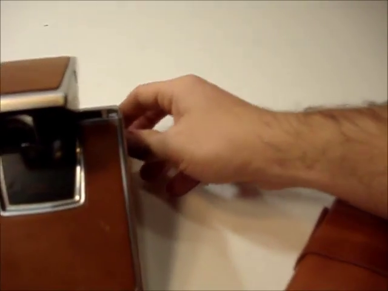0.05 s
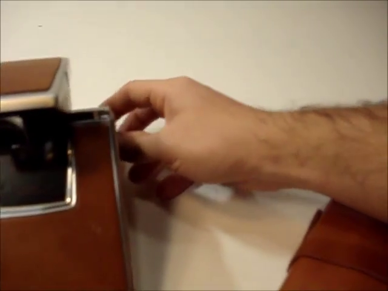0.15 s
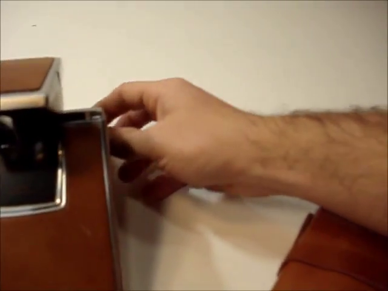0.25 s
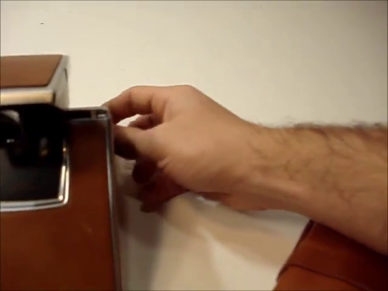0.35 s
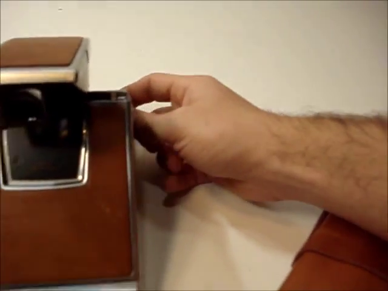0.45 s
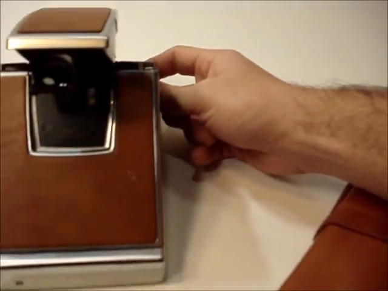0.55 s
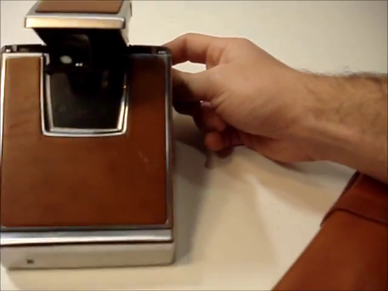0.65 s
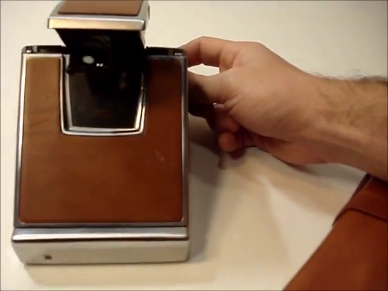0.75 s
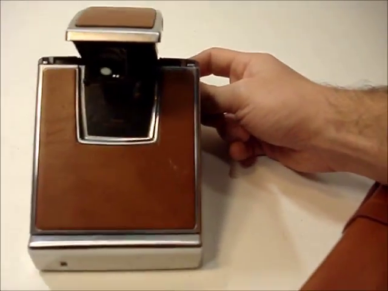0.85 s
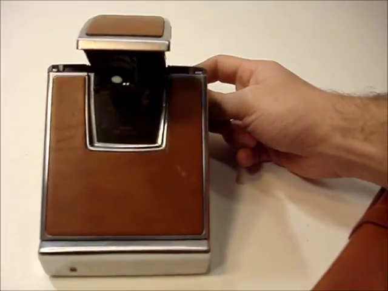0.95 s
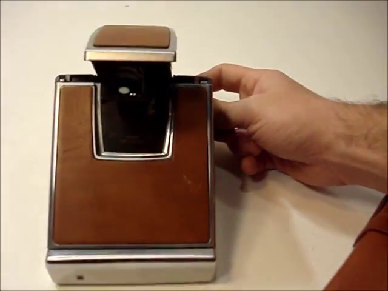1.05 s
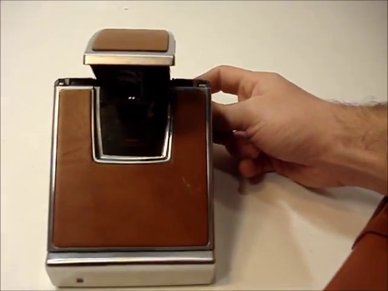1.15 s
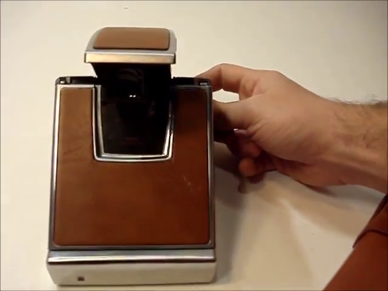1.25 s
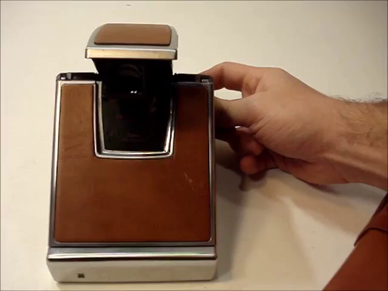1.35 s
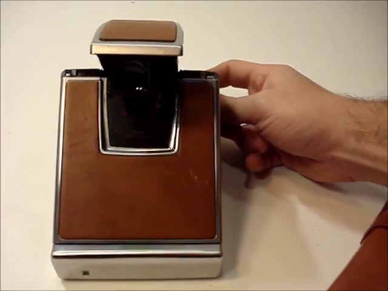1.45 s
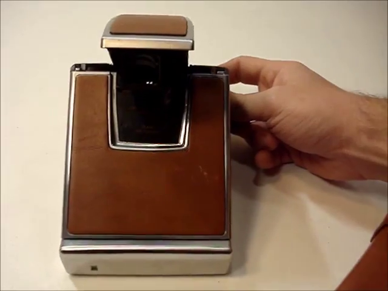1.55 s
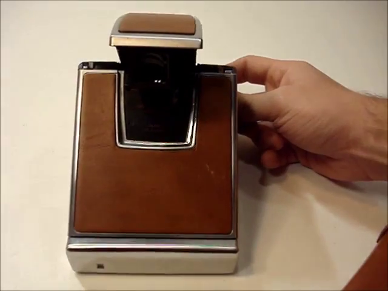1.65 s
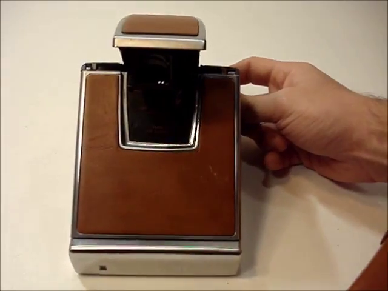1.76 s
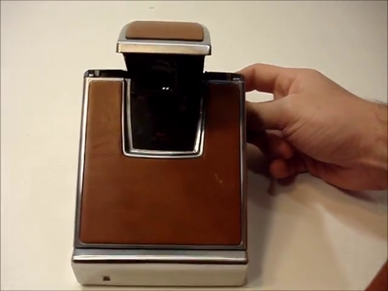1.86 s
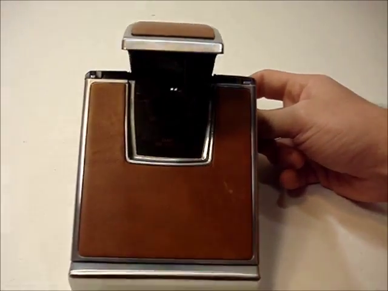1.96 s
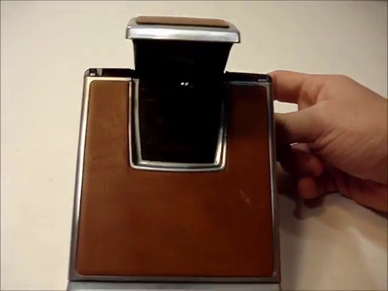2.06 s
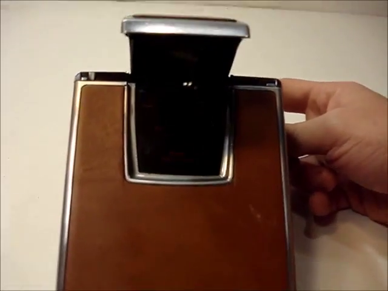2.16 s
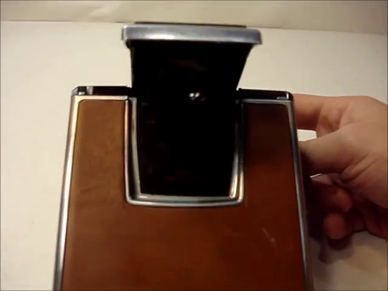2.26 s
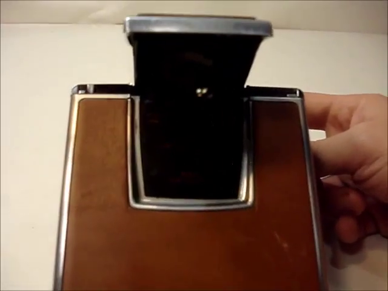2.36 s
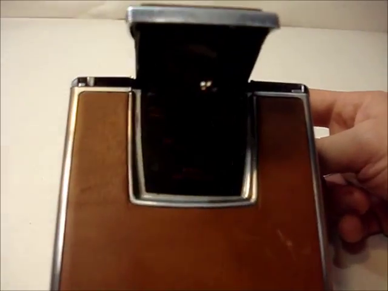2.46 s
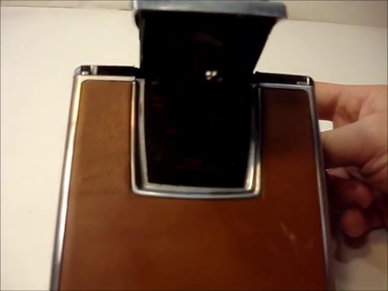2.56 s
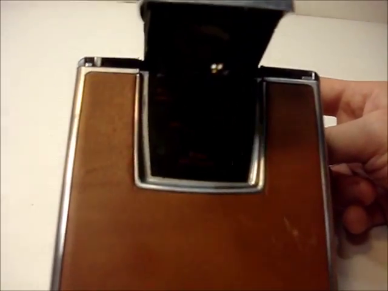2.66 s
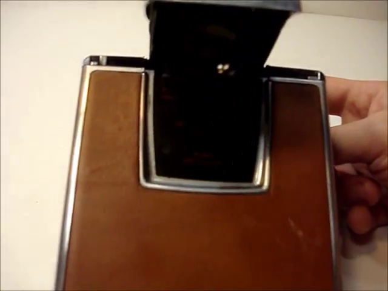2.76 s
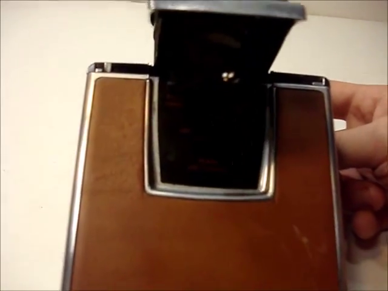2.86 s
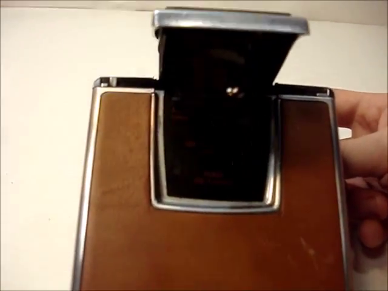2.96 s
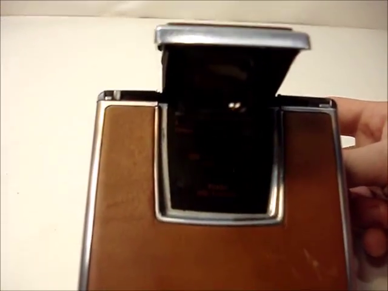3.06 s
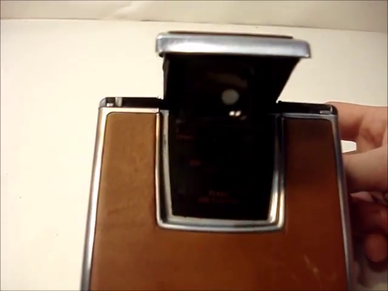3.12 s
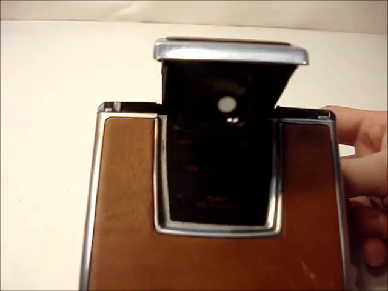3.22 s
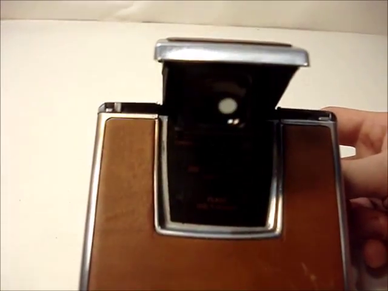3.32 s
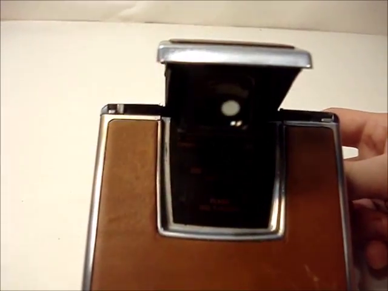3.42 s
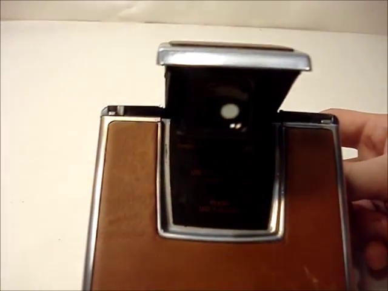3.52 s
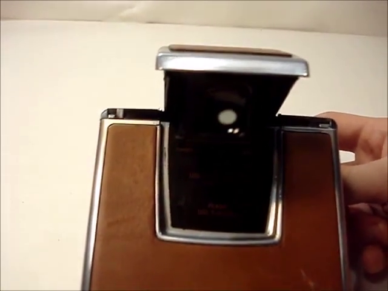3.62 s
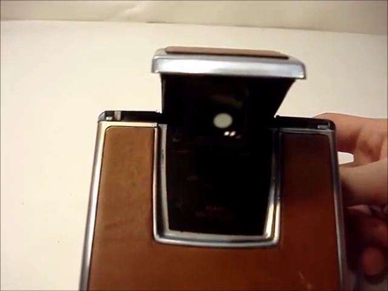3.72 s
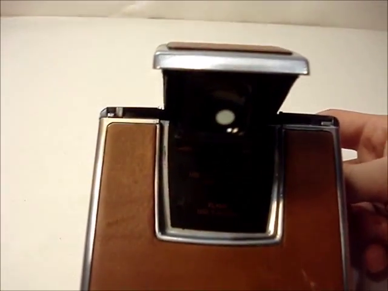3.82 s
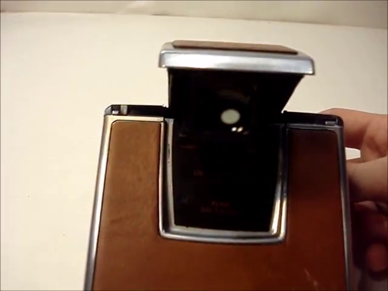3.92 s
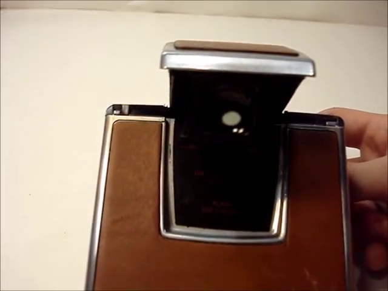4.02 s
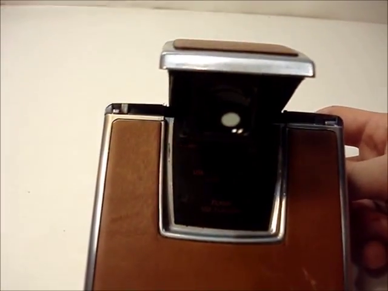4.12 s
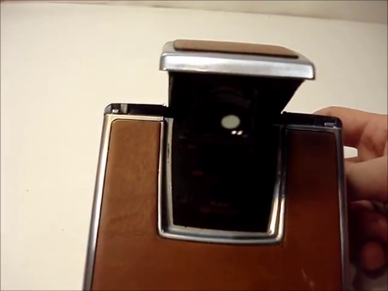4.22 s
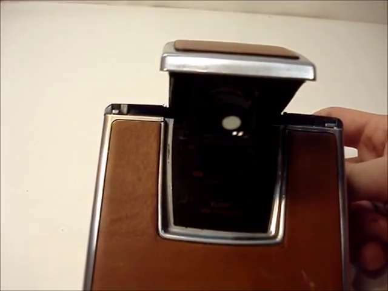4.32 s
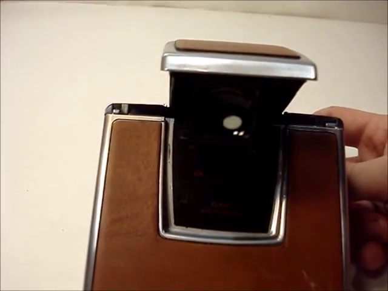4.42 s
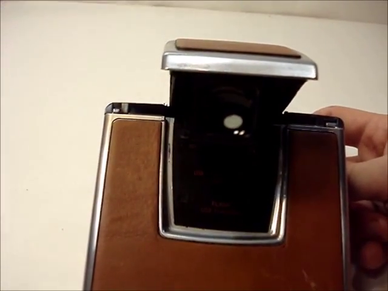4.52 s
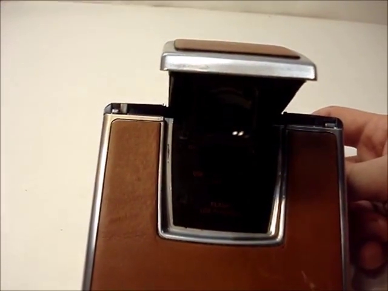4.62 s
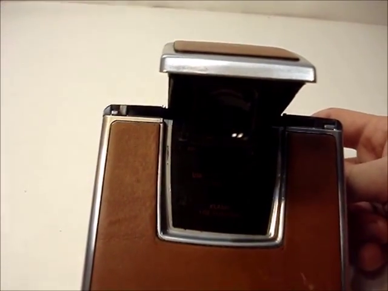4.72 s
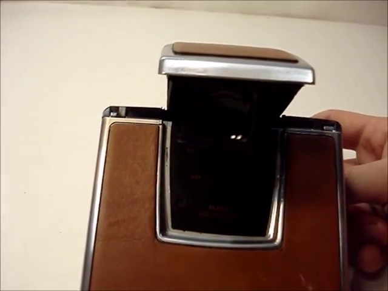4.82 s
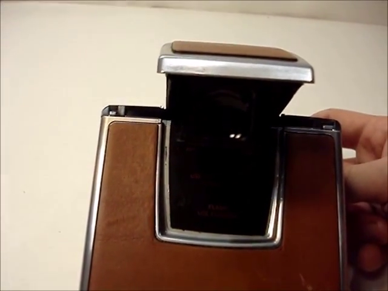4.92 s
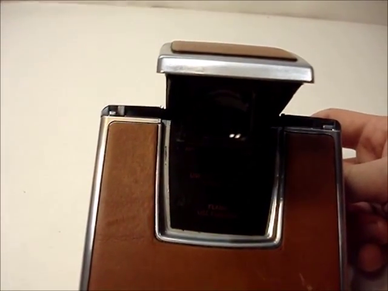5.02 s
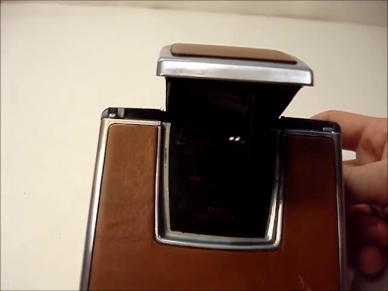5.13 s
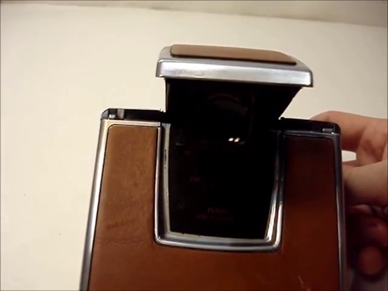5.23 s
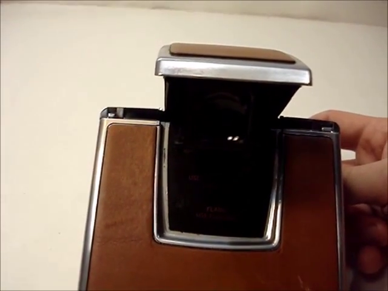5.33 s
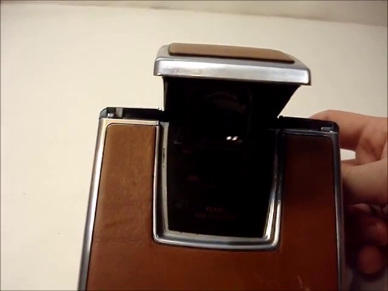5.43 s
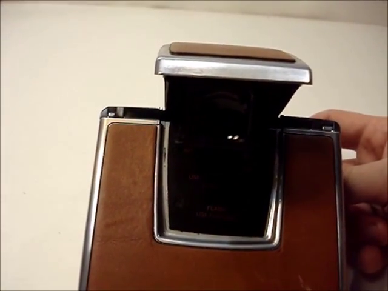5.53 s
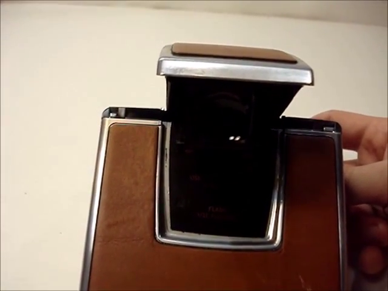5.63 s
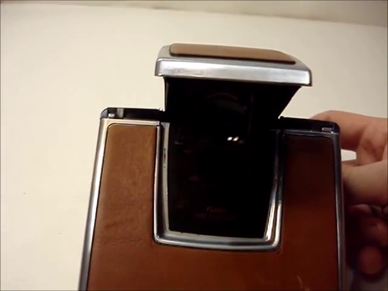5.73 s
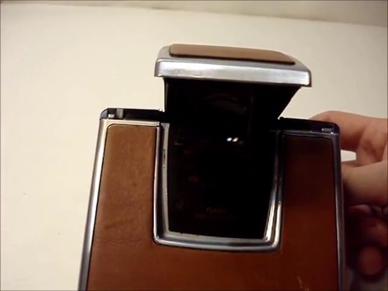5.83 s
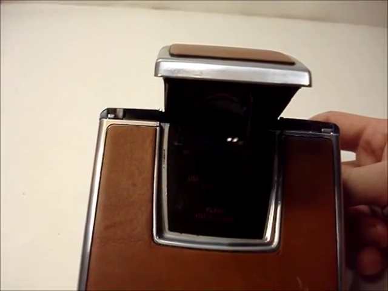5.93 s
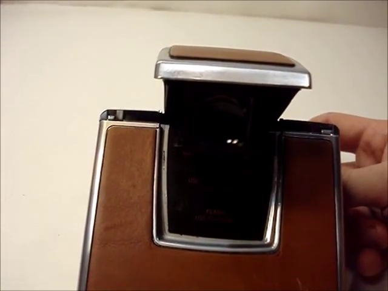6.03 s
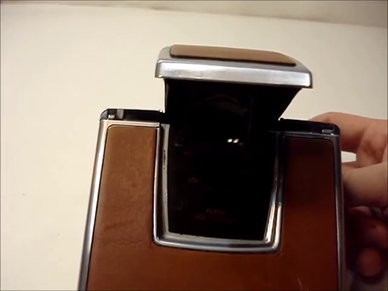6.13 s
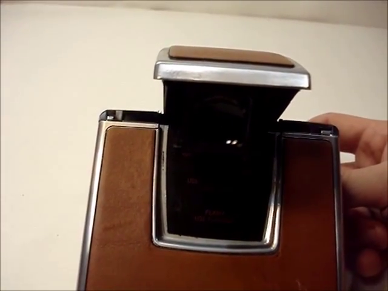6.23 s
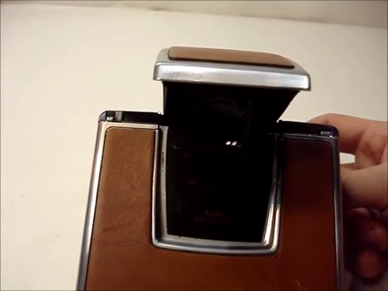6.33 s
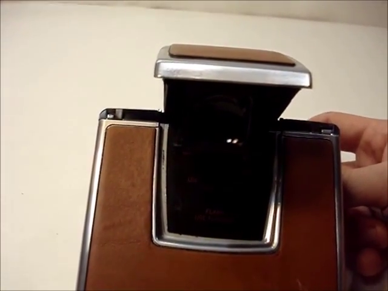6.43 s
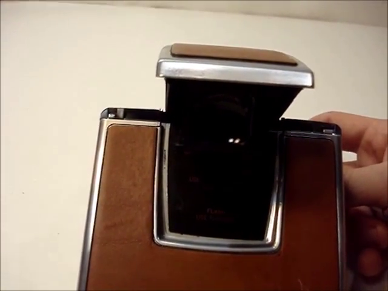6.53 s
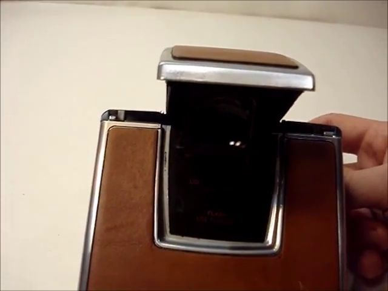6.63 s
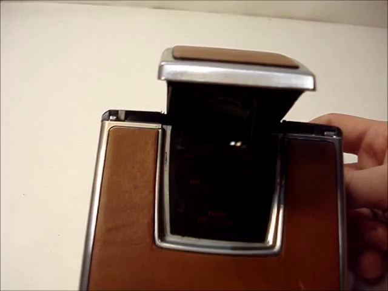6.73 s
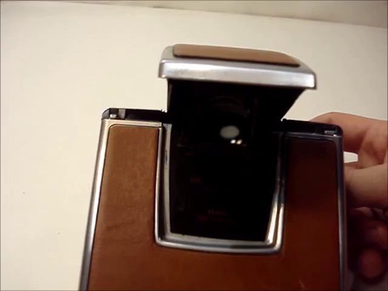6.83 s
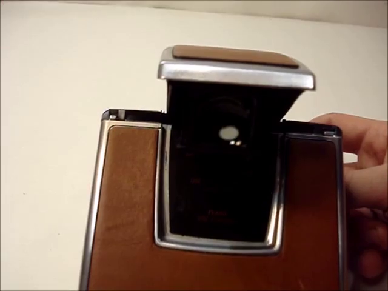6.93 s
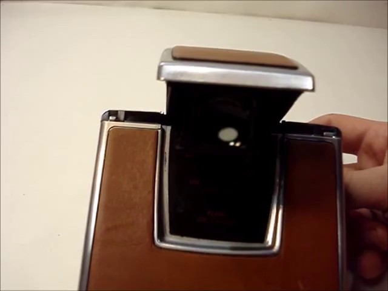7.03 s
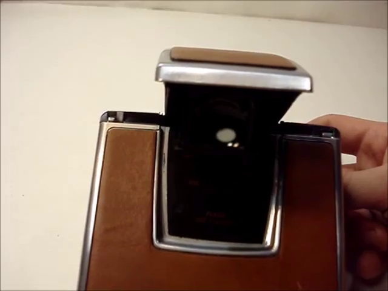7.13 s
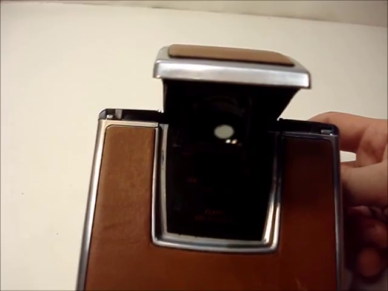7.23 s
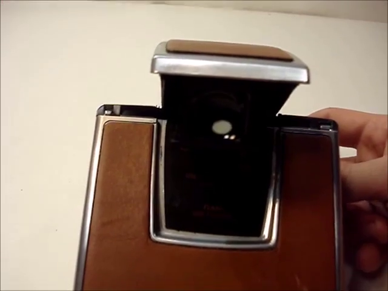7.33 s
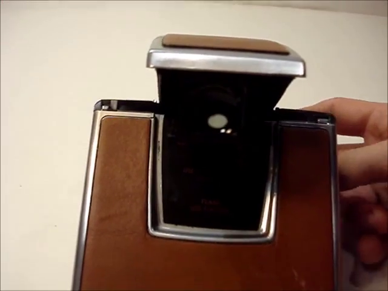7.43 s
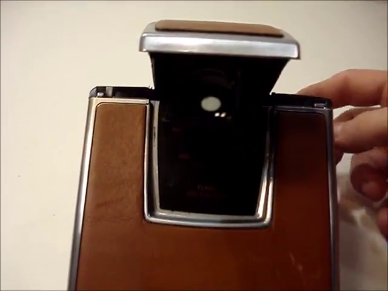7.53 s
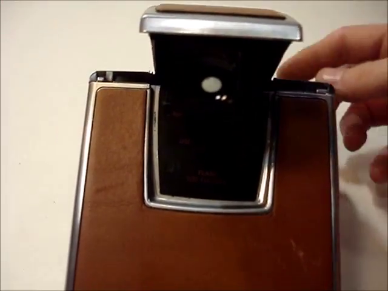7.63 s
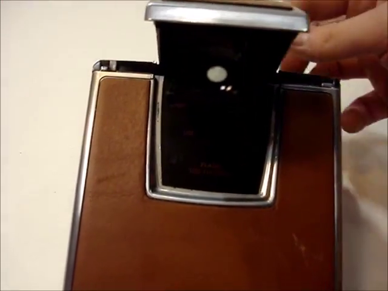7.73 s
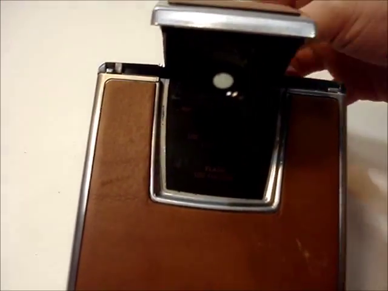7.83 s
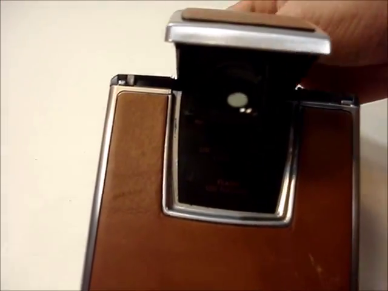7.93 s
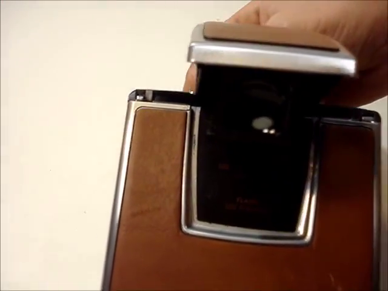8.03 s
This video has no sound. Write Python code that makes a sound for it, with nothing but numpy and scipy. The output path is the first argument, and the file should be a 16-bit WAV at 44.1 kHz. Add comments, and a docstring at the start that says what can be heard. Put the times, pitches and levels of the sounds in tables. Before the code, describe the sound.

Twice, an instant camera's shutter snaps and its small geared motor whirs steadily, then clicks to a stop, close by on a table.

```python
"""Faint room air and hiss come first; then a shutter clicks and a small motor whirs up in a folding instant camera.
The camera runs through its cycle twice on a table: the motor releases the mirror, which slaps upward and bounces,
then drives gears and rollers until a cam stops it, and the electronics buzz faintly for a moment.
The motor and gears follow one shaft angle: sine tones plus filtered tooth knocks and rubbing noise.
Strikes are shaped noise bursts, slaps are decaying modes, jolts are slow pulses and the buzz is steady sines."""
import sys
import numpy as np
from scipy import signal
from scipy.fft import rfft, irfft, next_fast_len
from scipy.io import wavfile

SR = 44100
rng = np.random.default_rng(int(sys.argv[2]) if len(sys.argv) > 2 else 0)


def put_to_file(sound):
    """Save the sound as 16-bit audio at rate SR, in the file named by the first command-line argument."""
    columns = np.atleast_2d(sound).T  # one column per channel
    safe = np.clip(columns, -1, 1)
    whole_steps = np.round(safe * 32767)
    wavfile.write(sys.argv[1], SR, whole_steps.astype(np.int16))


N = 356019

# two motor runs a cycle, to release the mirror and to drive the rollers:
# (on [s], off [s], gears [dB], tones [dB])
MOTOR_RUNS = [(1.27, 1.409, 2.5, 0.5), (1.593, 3.271, 0, -0.5), (4.719, 4.865, 1, 0.5),
              (5.068, 6.964, 0, 0)]
# speed that the load allows in each cycle, three poles passing per shaft turn: (time [s], pole rate [Hz])
FIRST_LOAD_SPEED = [(1.4, 460), (1.75, 474), (1.86, 451), (1.94, 466), (2.16, 468), (2.31, 444),
                    (3.02, 418), (3.15, 415), (3.26, 380)]
SECOND_LOAD_SPEED = [(4.85, 408), (5.24, 412), (5.36, 382), (5.49, 406), (5.72, 408), (5.92, 384),
                     (5.99, 393), (6.09, 393), (6.3, 383), (6.85, 373), (6.96, 330)]
# depth of the slow waver of each of the four pole tones: (rms swell [dB])
POLE_WAVER = [1.1, 2.2, 1.3, 2.4]
# the octave of the pole tone swells for a moment: (time [s], half length [s], level [dB])
OCTAVE_SWELLS = [(2.97, .04, 4), (3.22, .04, 4), (6.03, .1, 5.5)]
# modes of the motor's frame, which the pole tones glide through: (frequency [Hz], width [Hz], level [dB])
FRAME_MODES = [(385, 44, -36.5), (437, 40, -26.6), (748, 24, -43), (786, 24, -33), (838, 14, -34),
               (876, 22, -35.5), (1190, 110, -43), (1402, 40, -33), (1625, 24, -41)]
# weaker tones of the shaft: (multiple of the shaft rate, relative level [dB])
SHAFT_TONES = [(4, -6.5), (5, -7.5), (7, -8), (8, -5.5), (10, -5), (11, -7.5), (13, -5.5), (14, -3),
               (15, -7.5), (16, -9), (17, -27.5)]
# colour of the gear rattle: (frequency [Hz], relative level [dB])
GEAR_COLOUR = [(60, -14), (140, -9.5), (220, -10), (320, -6.5), (500, -4.5), (750, 2.5), (1020, -4.5),
               (1400, 0.5), (2200, 1.5), (3000, 2), (4000, 1), (4900, 4.5), (8000, -0.5), (10000, -3.5)]
# moments when the loose gears settle into a regular buzz: (time [s], half length [s], how fully [0-1])
SETTLED_MOMENTS = [(1.865, .022, .7), (3.21, .035, .7), (6.052, .021, 1), (6.628, .021, 1),
                   (6.79, .015, .6)]
# housing resonances as heard from three positions:
# (frequency [Hz], width [Hz], far [dB], near [dB], near and higher [dB]), levels relative
HOUSING_MODES = [(2060, 130, -11, -0.5, 3), (2550, 104, 1, 2.5, -2), (2880, 200, -11, -30, -7.5),
                 (3510, 120, 0, 0.5, -9), (4460, 260, -11, -30, -3), (4770, 150, -6.5, -4.5, -4.5),
                 (5280, 180, -9, -4.5, -12), (7010, 140, 1, 3, -12), (7310, 380, 3, -30, -15),
                 (7530, 170, -21, -18, 0), (8680, 640, -10, 2, -14)]
# where the microphone is: (time [s], position [0 far, 1 near, 2 near and higher])
MIC_PATH = [(2.1, 0.031), (2.4, 1.12), (3.4, 1.4), (4.6, 2)]
# loudness of the works at positions 0, 1 and 2: (gear rattle [dB], gear treble [dB], shaft tones [dB])
MIC_LEVELS = [(-31, -31, -36), (-29.5, -28, -34), (-31, -31, -36)]
# the mirror slaps up and bounces: (time [s], level [dB])
MIRROR_SLAPS = [(1.5213, -2), (1.5431, -19), (4.9951, -3.5), (5.0192, -14.5)]
# what the mirror and its frame ring with: (frequency [Hz], level [dB], t60 [s])
MIRROR_MODES = [(154, -37.5, 0.12), (229, -21, 0.08), (260, -9.5, 0.039), (442, -12, 0.068),
                (576, 2.5, 0.017), (654, 1, 0.025), (728, 0.5, 0.025), (915, -30, .045),
                (1345, -15.5, 0.046), (1470, -10, 0.036), (1880, -23, 0.051), (2884, -12.5, 0.031)]
# the small parts strike in turn through both cycles: (time [s], part, level [dB])
PART_STRIKES = [(1.258, "solenoid", -2), (1.273, "shutter", 0), (1.4082, "latch", -1.5),
                (1.4802, "spring", -2), (1.516, "linkage", -14), (1.5219, "mirror stop", -1),
                (1.528, "mirror hinge", 0), (1.598, "blades", 1), (3.212, "cam", -2.5),
                (3.222, "catch", -1), (3.236, "shutter", 3), (4.697, "solenoid", 2),
                (4.714, "shutter", 0.5), (4.859, "latch", -1.5), (4.949, "spring", 0.5),
                (4.988, "linkage", -5.5), (4.997, "mirror stop", -3.5), (5.003, "mirror hinge", 2),
                (5.061, "solenoid", -12), (5.074, "blades", 1.5), (6.903, "cam", -4), (6.913, "catch", -2),
                (6.97, "brake", 0)]
# how each part sounds, levels relative:
# (part, knock [dB], ring [dB], ring frequency [Hz], snap [dB], t60 [s])
PART_SOUNDS = [("solenoid", -45, -30.5, 2750, -38.5, 0.052), ("shutter", -31, -36, 2400, -23.5, 0.021),
               ("latch", -20, -18.5, 1545, -21, .04), ("spring", -47, -33, 1380, -46, .065),
               ("linkage", -26, -25.5, 5400, -41, 0.11), ("mirror stop", -19.5, -21, 2100, -19.5, 0.038),
               ("mirror hinge", -28.5, -25, 2700, -32.5, 0.033), ("blades", -40, -29, 2700, -28, .035),
               ("cam", -39, -41, 2650, -24.5, 0.12), ("catch", -32.5, -41, 2900, -22, 0.075),
               ("brake", -27, -43, 1400, -51, 0.027)]
# soft pushes of air and case as the works jolt: (time [s], level [dB], length [s], rebound [0-1])
JOLTS = [(1.407, -21.5, 0.0013, 0.74), (1.528, -44, .004, 0.7), (3.228, -20.5, 0.0068, 0.44),
         (4.86, -19.5, 0.0025, 0.34), (4.995, -18, 0.0032, 0.4), (6.921, -18, 0.0065, 0.46)]
# the faint buzz after each cycle: (start [s], end [s], level [dB])
BUZZ_SPANS = [(3.27, 3.79, .5), (6.96, 7.47, -1)]
# partials of the buzz: (frequency [Hz], level [dB])
BUZZ_PARTIALS = [(350, -60), (1050, -64), (1400, -63), (1755, -63), (2105, -60), (2805, -69), (3505, -75),
                 (5260, -76)]
# how fast the reflections die: (frequency [Hz], t60 [s])
ROOM_DECAY = [(200, 0.34), (530, 0.2), (1400, 0.2), (3700, 0.17), (9000, 0.11)]
# colour of room air and microphone hiss: (frequency [Hz], relative level [dB per Hz])
AIR_COLOUR = [(12, -60), (20, -25), (95, -5.5), (169, -3), (237, 0.5), (378, -1.5), (558, -2.5), (803, -4),
              (963, -6), (1390, -7.5), (1660, -9.5), (2870, -12.5), (7710, -18.5), (10000, -23.5),
              (13000, -60), (22000, -120)]

SPIN_UP_S = .043  # time constant of the run-up
COAST_S, BRAKE_S, COAST_DB_PER_S = 0.055, .13, -300  # run-on length, slowing time constant, fade
GEAR_POWER, SHAFT_POWER, POLE_POWER = 1.78, 0.58, 1  # loudness grows as these powers of the speed share
SHAFT_SHARE, POLE_SHARE = .2, .14  # shares of the loose rattle's power that repeat with shaft and poles
PLAY_TURNS = .004  # rms play of fully loose gears
SETTLE_SHARE, SETTLE_HZ = .4, 9  # depth and pace of partial settling
AIR_DB = -51.5
EDGE_HZ = 10030


def motor(on, off, gears_db, tones_db, low_db=-10, shaft_db=-7.5, flutter=.004, waver_db=3.0):
    """One shaft angle drives pole tones, shaft tones and gears. Returns (rattle and whine, pole tones)."""
    t = np.arange(on, off + COAST_S, 1 / SR)
    pole_hz, share = speed(t, on, off)
    position = np.interp(t, *np.transpose(MIC_PATH))
    rattle, treble, shaft = (np.interp(position, range(len(MIC_LEVELS)), c) for c in np.transpose(MIC_LEVELS))
    turns = np.cumsum(pole_hz / 3 * (1 + flutter * drift(len(t), 40))) / SR

    def tone(order):
        return np.sqrt(2) * np.sin(2 * np.pi * (order * turns + rng.random()))

    octave_db = sum(db * np.exp(-((t - s) / half) ** 2) for s, half, db in OCTAVE_SWELLS)
    poles = np.zeros(len(t))
    for k, depth_db in enumerate(POLE_WAVER, 1):
        level_db = tones_db + depth_db * drift(len(t), 8) + (k == 2) * octave_db
        poles += amp(level_db) * frame(k * pole_hz) * tone(3 * k)
    whine = np.zeros(len(t))
    for order, db in SHAFT_TONES:
        level_db = shaft + shaft_db + db + waver_db * drift(len(t), 5.8)
        whine += amp(level_db) * tone(round(order))

    gears = radiate(t, teeth(t, turns))
    spectrum = rfft(gears)
    register = np.digitize(bins(gears), [1900, 5500])
    low, middle, high = (unit(irfft(spectrum * (register == k), len(t))) for k in range(3))
    whir = amp(gears_db) * (amp(rattle) * middle + amp(treble) * high)
    body = whine + amp(rattle + low_db) * low + labour(pole_hz, shaft)

    fade = amp(COAST_DB_PER_S * np.maximum(t - off, 0))
    fade *= signal.windows.tukey(len(t), 0.0036 * SR / len(t))  # soft edges
    works = share ** SHAFT_POWER * body + share ** GEAR_POWER * whir
    return fade * works, fade * share ** POLE_POWER * poles


def speed(t, on, off):
    """The motor runs up to what the load allows, then coasts. Returns (pole rate in Hz, share of that speed)."""
    run_up = 1 - np.exp(-(t - on) / SPIN_UP_S)
    share = run_up * np.exp(-np.maximum(t - off, 0) / BRAKE_S)
    return share * np.interp(t, *np.transpose(FIRST_LOAD_SPEED + SECOND_LOAD_SPEED)), share


def frame(hz):
    """Gain of the motor's frame for a tone at hz: the powers of its modes add."""
    return np.sqrt(sum(amp(db) ** 2 / (1 + ((hz - f) / (width / 2)) ** 2) for f, width, db in FRAME_MODES))


def labour(pole_hz, shaft_db, free_hz=385, span_hz=90, groan_db=2.5):
    """While slow and under heavy torque, the motor shakes the frame into a low rasp."""
    torque = np.clip((free_hz - pole_hz) / span_hz, 0, 1)
    rasp = unit(band(rng.standard_normal(len(torque)), 603, 920))
    return torque * amp(shaft_db + groan_db) * rasp


def teeth(t, turns, count=12, wear_db=0.5, chatter_db=2.0, backlash=.1, rub=1.0, flicker_db=0.92):
    """Pinion teeth knock one after another, unevenly worn and a little loose, while their flanks rub."""
    tooth = np.floor(count * turns + backlash * drift(len(t), 400)).astype(int)
    at = np.flatnonzero(np.diff(tooth) > 0)
    wear = wear_db * unit(rng.standard_normal(count))
    knocks = np.zeros(len(t))
    knocks[at] = amp(wear[tooth[at] % count] + chatter_db * rng.standard_normal(len(at)))
    knocks[at] -= 0.56 * knocks[at].mean()  # the even share of the load is carried smoothly
    sliding = rng.standard_normal(len(t)) * (1 + .5 * np.cos(2 * np.pi * turns))  # hardest once a turn
    chaos = unit(band(unit(knocks) + rub * unit(sliding), 30, 11000))

    loose = looseness(t)
    angle = turns + PLAY_TURNS * loose * drift(len(t), 150)
    with_shaft, with_poles = repeating(angle, 18, 80), repeating(3 * angle, 6, 29)
    # as the gears settle, power moves from chaos and shaft to the poles
    drive = np.sqrt(loose * (1 - SHAFT_SHARE - POLE_SHARE)) * chaos
    drive += np.sqrt(loose * SHAFT_SHARE) * with_shaft
    drive += np.sqrt(1 - loose * (1 - POLE_SHARE)) * with_poles
    return drive * amp(flicker_db * drift(len(t), 49))


def looseness(t):
    """How freely the gears rattle, 0-1: now and then they settle for a moment, partly or almost fully."""
    partly = SETTLE_SHARE * np.clip(drift(len(t), SETTLE_HZ) - .5, 0, 1)
    fully = sum(part * np.exp(-((t - s) / half) ** 4) for s, half, part in SETTLED_MOMENTS)
    return np.clip(1 - np.maximum(partly, fully), .08, 1)


def repeating(turns, first, last, morph_hz=9.8):
    """A rattle that repeats each cycle, on partials from first to below last, as its shape slowly changes."""
    k = np.arange(last)
    place = np.arange(2 ** 11) / 2 ** 11
    shapes = [irfft(np.exp(2j * np.pi * rng.random(last)) * (k >= first), len(place)) for _ in range(4)]
    weights = np.array([drift(len(turns), morph_hz) for _ in shapes])
    weights /= np.linalg.norm(weights, axis=0)
    return unit(sum(w * np.interp(turns % 1, place, shape) for w, shape in zip(weights, shapes)))


def radiate(t, drive, ring_db=8.5):
    """The housing rings with the gears; which resonances stand out depends on where the microphone is."""
    drive = np.pad(drive, (0, next_fast_len(len(t) + 2 ** 11) - len(t)))
    hz, position = bins(drive), np.interp(t, *np.transpose(MIC_PATH))
    spectrum = rfft(drive) * amp(read(GEAR_COLOUR, hz))
    out = np.zeros(len(t))
    for k in range(3):
        ring = sum(amp(levels[k]) / (1 + ((hz - f) / (width / 2)) ** 2) for f, width, *levels in HOUSING_MODES)
        heard = irfft(spectrum * (1 + amp(ring_db) * ring / 2), len(drive))[:len(t)]
        out += np.clip(1 - abs(position - k), 0, 1) * heard  # crossfade between positions
    return out


def slap(db, rise=0.0023):
    """The mirror hits its stop and rings the hollow body in decaying sine modes."""
    t = np.arange(SR // 4) / SR
    modes = sum(amp(level) * decay(t, t60) * np.sin(2 * np.pi * hz * t) for hz, level, t60 in MIRROR_MODES)
    return -amp(db) * modes * (1 - np.exp(-t / rise))


def click(knock_db, ring_db, ring_hz, snap_db, t60, size_db=7.0, rise=0.0013, spread=1.27):
    """Small metal parts strike: a knock of the case, the part's own ring and a bright snap, all from noise."""
    t = np.arange(SR // 4) / SR
    registers = [(knock_db, 400, 900), (ring_db, ring_hz / spread, ring_hz * spread), (snap_db, 3400, 9500)]
    strike = sum(amp(db) * unit(band(rng.standard_normal(len(t)), lo, hi)) for db, lo, hi in registers)
    return amp(size_db) * strike * (1 - np.exp(-t / rise)) * decay(t, t60)


def push(db, length, rebound):
    """One slow swing of pressure and its rebound."""
    u = np.arange(SR // 4) / SR / length
    return amp(db) * np.e * u * (1 - rebound * u) * np.exp(-u)


def buzz(start, end, db, sag_db=4.5):
    """A steady electrical buzz of fixed sines that sags a little and stops."""
    t = np.arange(0, end - start, 1 / SR)
    tones = sum(amp(level) * np.sqrt(2) * np.sin(2 * np.pi * (hz * t + rng.random())) for hz, level in BUZZ_PARTIALS)
    sag = amp(db + sag_db * (.5 - t / t[-1]))
    return sag * tones * signal.windows.tukey(len(t), .15)


def room(x, wet_db=-10.0):
    """Dense reflections from table and walls, each band dying at its own speed."""
    taps = rng.standard_normal(SR // 2) * (np.arange(SR // 2) > .004 * SR)  # none in the first 4 ms
    hz, t, z = signal.stft(taps, SR, nperseg=256)
    tail = signal.istft(z * decay(t, read(ROOM_DECAY, hz)[:, None]), SR, nperseg=256)[1]
    return amp(wet_db) * signal.fftconvolve(x, tail / np.linalg.norm(tail))[:N]


def air():
    """Room air and microphone hiss: steady coloured noise."""
    return amp(AIR_DB) * unit(colour(rng.standard_normal(N), AIR_COLOUR))


def amp(db):
    """Decibels to gain."""
    return 10 ** (np.asarray(db) / 20)


def unit(x):
    """Scales to rms 1."""
    return x / np.sqrt(np.mean(x ** 2) + 1e-20)


def decay(t, t60):
    """Exponential fade that has lost 60 dB at t60 seconds."""
    return np.exp(-np.log(1000) * t / t60)


def read(points, hz):
    """Reads a spectrum table on a log-frequency axis."""
    f, value = np.transpose(points)
    return np.interp(np.log(hz + 1), np.log(f + 1), value)


def bins(x):
    """The frequencies of the spectrum of x, in Hz."""
    return np.fft.rfftfreq(len(x), 1 / SR)


def colour(x, points):
    """Filters x by a table of (frequency [Hz], level [dB])."""
    return irfft(rfft(x) * amp(read(points, bins(x))), len(x))


def band(x, lo_hz, hi_hz):
    """Causal band-pass."""
    return signal.sosfilt(signal.butter(2, [lo_hz, hi_hz], "band", fs=SR, output="sos"), x)


def drift(size, hz):
    """Slow random wander, mostly below hz, made at rms 1 on a coarse grid and interpolated."""
    step = 2 ** 4
    x = rng.standard_normal(2 ** 13)
    slow = unit(irfft(rfft(x) / (1 + (bins(x) / step / hz) ** 4)))
    return np.interp(np.arange(size) / step, np.arange(len(slow)), slow)


def add(mix, s, sound):
    """Mixes a sound in at time s."""
    part = mix[max(round(s * SR), 0):][:len(sound)]
    part += sound[:len(part)]


def scene():
    """Both cycles, the room and its air, alike in both channels; pole tones, pushes and buzz stay dry."""
    works, direct = np.zeros(N), np.zeros(N)
    for on, *row in MOTOR_RUNS:
        rattle, tones = motor(on, *row)
        add(works, on, rattle)
        add(direct, on, tones)
    for s, db in MIRROR_SLAPS:
        add(works, s, slap(db))
    sound_of = {part: row for part, *row in PART_SOUNDS}
    for s, part, db in PART_STRIKES:
        add(works, s, amp(db) * click(*sound_of[part]))
    for s, *row in JOLTS:
        add(direct, s, push(*row))
    for start, end, db in BUZZ_SPANS:
        add(direct, start, buzz(start, end, db))
    mix = direct + works + room(works) + air()
    return np.array([mix, mix])


def record(dry):
    """The recorder's band limit: a linear-phase low-pass."""
    low_pass = signal.firwin(601, EDGE_HZ, window=("kaiser", 9), fs=SR)
    return signal.oaconvolve(dry, low_pass[None], "same")


dry = scene()
out = record(dry)
put_to_file(out)
```